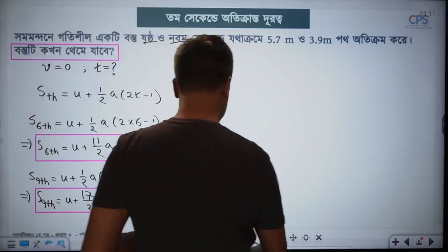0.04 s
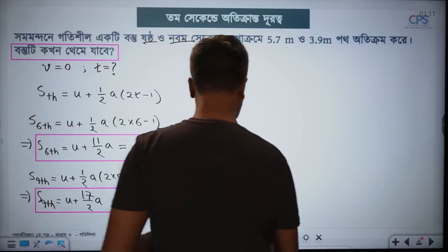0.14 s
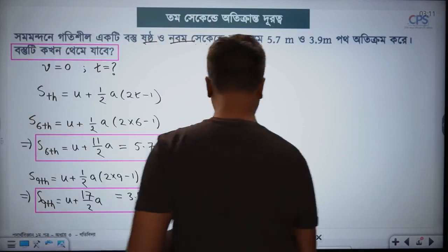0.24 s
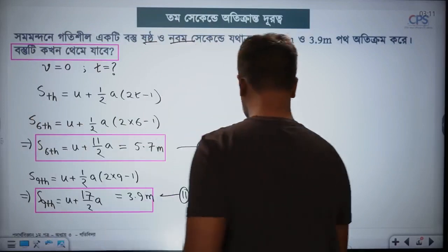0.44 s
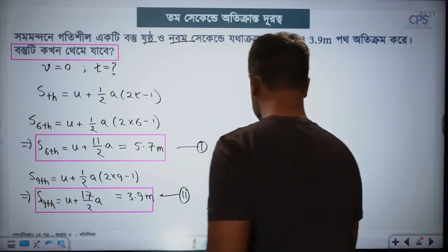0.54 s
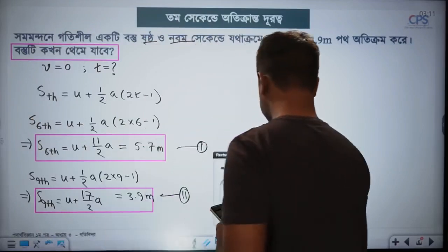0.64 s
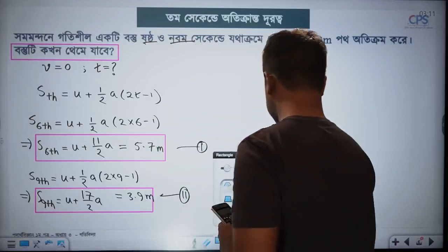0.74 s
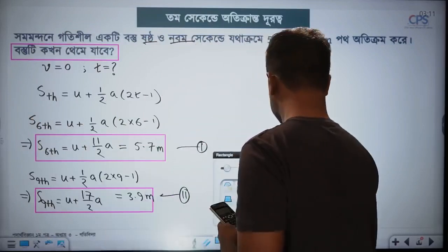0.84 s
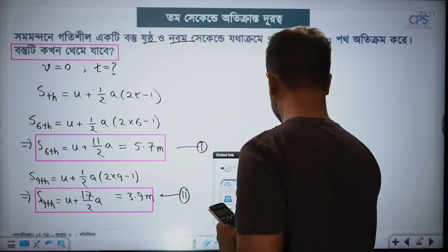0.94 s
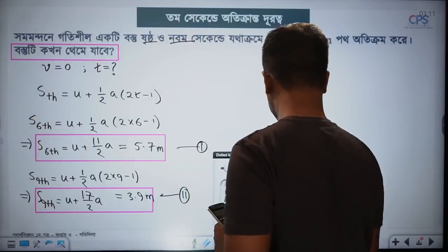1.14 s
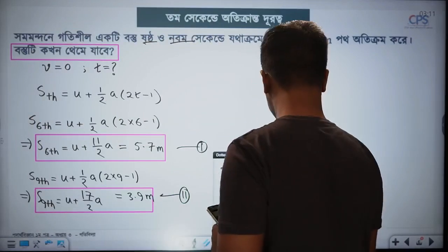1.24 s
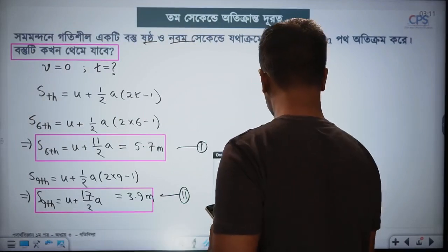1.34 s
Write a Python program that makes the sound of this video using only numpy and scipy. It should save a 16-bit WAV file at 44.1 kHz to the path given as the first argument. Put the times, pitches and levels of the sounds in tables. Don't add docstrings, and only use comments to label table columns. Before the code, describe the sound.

Three knocky plastic key presses on a handheld calculator, a quick pair then a later, crisper one, each with a slight rattle and brief classroom reverberation over very quiet hum, hiss and soft clothing movement.

```python
import sys
import numpy as np
from scipy import signal
from scipy.fft import rfft, irfft, next_fast_len
from scipy.io import wavfile
from scipy.ndimage import uniform_filter1d, map_coordinates

SR = 44100
rng = np.random.default_rng(int(sys.argv[2]) if len(sys.argv) > 2 else 0)


def transcribe(signal):
    frames = np.atleast_2d(signal).T
    limited = np.clip(frames, -1, 1)
    pcm = np.round(limited * 32767).astype(np.int16)
    wavfile.write(sys.argv[1], SR, pcm)


def field_ratio(decibels):
    return 10 ** (np.asarray(decibels, dtype=float) / 20)


N = 61739

# start_s, peak_db, contact_ms, crack_db
PRESSES = [
    (.202, -17.5, 0.69, -25.5),
    (0.3507, -24, 0.86, -24),
    (1.0078, -19, 0.51, -16),
]
# centre_hz, width_hz, level_db
CASE_MODES = [
    [(244, 210, 2), (532, 420, 5.5), (1065, 240, 6.5), (3350, 400, -2)],
    [(255, 120, 13), (486, 480, 18), (980, 600, 9), (3080, 440, -24)],
    [(330, 300, 5.5), (556, 1200, -8), (1093, 350, 2), (3150, 220, -15)],
]
# centre_hz, width_hz, level_db
SHELL_MODES = [
    [(2360, 190, 4), (3280, 600, -3), (4070, 630, -1), (5700, 1900, -6.5), (12100, 13400, -13)],
    [(2170, 260, 2), (3130, 760, -1), (4200, 690, -2), (6040, 4450, -7.5), (10000, 4100, -29)],
    [(2000, 660, 9.5), (2860, 1400, 11), (4400, 580, -34), (5850, 4500, 4), (9500, 3200, -2.5)],
]
# pitch_hz, level_db, t60_s
PANEL_MODES = [
    [(151.5, -5, 0.485), (177.2, -0.5, 0.18), (201.3, -4, 0.38), (289.7, -2.5, 0.35), (324.6, -4, 0.4),
     (477.4, 3.5, 0.23), (547, 3, 0.19), (829, -3, 0.26), (937, -4, .2), (1080, -8, 0.093)],
    [(170, 1.5, 0.19), (283, -3, 0.4), (327, -8, 0.64), (479, -1, 0.28), (582, 3.5, 0.2), (808, -8, 0.36),
     (1135, -11, .2)],
    [(156.5, -4, 0.32), (200.1, -3, 0.37), (240.6, -13, 0.58), (309.5, -2, 0.39), (352, 6, 0.27),
     (478, -6, 0.37), (697, -23, 0.57), (864, -14.5, 0.45), (1190, -14, 0.4)],
]
# pitch_hz, t60_s, level_db
CAP_RINGS = [
    (3210, 0.011, -28),
    (3160, 0.011, -25),
    (3030, 0.0058, -16),
]
TOUCH_LEAD_S = [0.00166, 0.0037, 0.0044]
TOUCH_DB = [-23, -38, -38]
RATTLE_DB = [-3, -2.5, -3]
# delay_s, level_db
WALLS = [(.0039, -13.5), (.0072, -8), (0.0111, -8), (0.017, -14.5), (.022, -24), (.029, -33)]
WALL_DB = [-0.5, 1.5, -14.5]
WALL_SCATTER_S = [0, .001, .001]
# freq_hz, t60_s
ROOM_DECAY = [(150, 0.54), (400, 0.42), (1000, 0.29), (2800, 0.35), (7300, 0.34), (15000, 0.47)]
KNOCK_ROOM_DB = [0, 0.5, 0.5]
CRACK_ROOM_DB = [6.5, 4, 4.5]
# start_s, level_db, brightness_db_per_octave
RUSTLE = [(0, -70, 1.5), (0.031, -69.5, -3.5), (.12, -76.5, -0.5), (.415, -85, 1), (.432, -69.5, 6.5),
          (.47, -64.5, 1), (0.531, -79.5, 4), (.58, -73, -3.5), (.67, -76, 2.5), (.715, -66.5, -0.5),
          (.745, -65.5, -0.5), (.8, -66.5, -1), (0.858, -76.5, -1.5), (.99, -81, -3), (1.12, -83, -3),
          (1.2, -68.5, -1.5), (1.3, -78, -2), (1.4, -81.5, -4.5)]
# freq_hz, density_db_per_hz
CLOTH_SPECTRUM = [(590, -16), (1000, -2.5), (1100, -1), (1320, -4), (2460, -7), (3250, -4.5), (7630, -11),
                  (8280, -7.5), (15800, -22)]
# freq_hz, density_db_per_hz
AIR_SPECTRUM = [(60, -37), (130, 1.5), (300, 2.5), (550, -3), (900, -11.5), (2000, -16.5), (5000, -30.5),
                (15800, -60)]
# time_s, level_db
AIR_LEVEL = [
    [(0.0, -59), (0.014, -61.5), (0.11, -64), (0.19, -64.5)],
    [(0.55, -61), (0.698, -62), (0.71, -65), (0.99, -65)],
    [(1.22, -65.5), (1.316, -61.5), (1.322, -63), (1.4, -65)],
]
# freq_hz, density_db_per_hz
HISS_SPECTRUM = [(500, 6.5), (3000, -3.5), (6500, -5.5), (8050, -1.5), (11000, -4.5), (15500, -3.5),
                 (15800, -36)]
# freq_hz, density_db_per_hz
RUMBLE_SPECTRUM = [(20, -2), (40, -6.5), (90, 2.5), (120, -2.5), (160, -44)]
# time_s, level_db
HUM_LEVEL = [(0, -72), (.5, -74), (.72, -67), (.85, -71.5), (1.4, -72.5)]
# freq_hz, gain_db
TREBLE_DIP = [(6000, 0), (7300, -3.5), (7800, -11), (8000, 0)]

PANEL_DB, PANEL_RISE_CYCLES = 4.5 - 23.5, 2.9
CRACK_T60_S = 0.035
FAR_WALL_S, FAR_WALL_DB = 0.0205, -7
ROOM_RISE_S = 0.0039
LOW_CUT_HZ, EDGE_HZ, EDGE_DAMPING = 140, 1460, 0.98
CLOTH_SPLIT_HZ = 6000
HISS_DB, RUMBLE_DB = -72, -78
HUM_HZ, HUM_WOBBLE_DB = 120.6, 1.6
MIC_TOP_HZ = 15750
PRESS_T_S = np.arange(SR // 2) / SR


def keys():
    out = np.zeros(N + SR)
    settings = zip(CASE_MODES, SHELL_MODES, PANEL_MODES, WALL_DB, WALL_SCATTER_S,
                   KNOCK_ROOM_DB, CRACK_ROOM_DB, RATTLE_DB, CAP_RINGS)
    for event, own, lead_s, touch_db in zip(PRESSES, settings, TOUCH_LEAD_S, TOUCH_DB):
        start_s, peak_db, contact_ms, crack_db = event
        full, knock = press(contact_ms, crack_db, *own)
        out[round(start_s * SR):][:len(full)] += field_ratio(peak_db) * full
        out[round((start_s - lead_s) * SR):][:len(knock)] += field_ratio(peak_db + touch_db) * knock
    return out[:N]


def press(contact_ms, crack_db, case, shell, panel, wall_db, scatter_s,
          knock_room_db, crack_room_db, rattle_db, cap):
    knock = case_knock(contact_ms, case)
    click = shell_click(contact_ms, crack_db, shell)
    direct = knock + click + rattle(click, rattle_db) + cap_ring(contact_ms, *cap)
    send = field_ratio(knock_room_db) * knock + field_ratio(crack_room_db) * click
    wet = signal.fftconvolve(send, room_tail())[:len(knock)]
    return direct + wall_echoes(knock, wall_db, scatter_s) + panel_ring(panel) + wet, knock


def case_knock(contact_ms, case):
    push = -np.sin(np.pi * np.clip(PRESS_T_S * 1000 / contact_ms, 0, 1)) ** 2

    def radiation(f):
        low_cut = (-f * f / (LOW_CUT_HZ ** 2 - f * f + 1j * f * LOW_CUT_HZ * np.sqrt(2))) ** 2
        return low_cut * EDGE_HZ ** 2 / (EDGE_HZ ** 2 - f * f + 1j * f * EDGE_HZ * EDGE_DAMPING)

    knock = filtered(filtered(push, resonances(case)), radiation)
    return knock / np.abs(knock).max()


def shell_click(contact_ms, crack_db, shell):
    impulse = np.zeros(len(PRESS_T_S))
    impulse[round(contact_ms * SR / 2000)] = -1
    click = filtered(impulse, resonances(shell, sign=-1))
    return field_ratio(crack_db) * click / np.abs(click).max()


def rattle(click, rattle_db):
    fade = field_ratio(-60 * PRESS_T_S / CRACK_T60_S)
    back_fade = field_ratio(FAR_WALL_DB - 60 * np.abs(PRESS_T_S - FAR_WALL_S) / CRACK_T60_S)
    back = (PRESS_T_S > FAR_WALL_S) * back_fade
    chatter = field_ratio(rattle_db) * (fade + back) * rng.standard_normal(len(PRESS_T_S))
    return signal.fftconvolve(chatter, click)[:len(click)] / 4


def cap_ring(contact_ms, pitch_hz, t60_s, level_db):
    late_s = np.maximum(PRESS_T_S - contact_ms / 2000, 0)
    return field_ratio(level_db - 60 * late_s / t60_s) * np.sin(2 * np.pi * pitch_hz * late_s)


def panel_ring(modes):
    ring = np.zeros(len(PRESS_T_S))
    for pitch_hz, level_db, t60_s in modes:
        rise = 1 - np.exp(-PRESS_T_S * pitch_hz / PANEL_RISE_CYCLES)
        tone = np.sin(2 * np.pi * (pitch_hz * PRESS_T_S + rng.random()))
        ring += field_ratio(level_db - 60 * PRESS_T_S / t60_s) * tone * rise
    return field_ratio(PANEL_DB) * ring


def wall_echoes(knock, wall_db, scatter_s):
    jitter_s = rng.standard_normal(len(WALLS)) * scatter_s

    def echoes(f):
        return sum(field_ratio(level_db + wall_db) * np.exp(-2j * np.pi * f * (delay_s + shift_s))
                   for (delay_s, level_db), shift_s in zip(WALLS, jitter_s))

    return filtered(knock, echoes)


def room_tail():
    hz, t, z = signal.stft(rng.standard_normal(SR // 2), SR, nperseg=256)
    decay = field_ratio(-60 * t / along(ROOM_DECAY, hz)[:, None])
    h = signal.istft(z * decay, SR, nperseg=256)[1][:SR // 2]
    h = h * (1 - np.exp(-np.arange(len(h)) / SR / ROOM_RISE_S))
    return h / np.linalg.norm(h)


def clothes():
    start_s, level_db, bright = np.transpose(RUSTLE)
    rub = rush(CLOTH_SPECTRUM, patchy_db=2.5)
    dull = filtered(rub, lambda hz: 1 / (1 + (hz / CLOTH_SPLIT_HZ) ** 2))
    tilt = field_ratio(2 * curve(np.transpose([start_s, bright])))
    swell = field_ratio(curve(np.transpose([start_s, level_db])))
    grain = field_ratio(1.2 * wobble(60))
    return swell * grain * (dull / tilt + (rub - dull) * tilt)


def background():
    air_db = curve(sum(AIR_LEVEL, [])) + 1.3 * wobble(25)
    air = field_ratio(air_db) * rush(AIR_SPECTRUM, patchy_db=1.5)
    hum_db = curve(HUM_LEVEL) + HUM_WOBBLE_DB * wobble(13.8)
    hum_phase = 2 * np.pi * HUM_HZ * np.arange(N) / SR + 0.5 * wobble(9)
    hum = np.sqrt(2) * field_ratio(hum_db) * np.sin(hum_phase)
    rumble = field_ratio(RUMBLE_DB) * rush(RUMBLE_SPECTRUM, patchy_db=-0.5)
    hiss = field_ratio(HISS_DB) * rush(HISS_SPECTRUM, patchy_db=0.5)
    return air + hum + rumble + hiss


def rush(spectrum, patchy_db):
    z = signal.stft(rng.standard_normal(N + 512), nperseg=512)[2]
    field = uniform_filter1d(rng.standard_normal(z.shape), 6, 0)
    field = uniform_filter1d(field, 8, 1)
    x = signal.istft(z * field_ratio(patchy_db * unit(field)), nperseg=512)[1][:N]
    return unit(filtered(x, lambda hz: field_ratio(along(spectrum, hz))))


def resonances(peaks, sign=1):
    def response(f):
        return sum(sign ** k * field_ratio(db) * 1j * f * width / (centre * centre - f * f + 1j * f * width)
                   for k, (centre, width, db) in enumerate(peaks))

    return response


def filtered(x, response):
    m = next_fast_len(len(x) + SR // 2)
    return irfft(rfft(x, m) * response(np.fft.rfftfreq(m, 1 / SR)), m)[:len(x)]


def wobble(rate_hz):
    knots = rng.standard_normal(int(N * rate_hz / SR) + 4)
    return map_coordinates(knots, [np.arange(N) * rate_hz / SR])


def curve(rows):
    s, v = np.transpose(rows)
    return np.interp(np.arange(N) / SR, s, v)


def along(points, hz):
    f, v = np.transpose(points)
    return np.interp(np.log(hz + 1), np.log(f + 1), v)


def unit(x):
    return x / np.sqrt(np.mean(x ** 2) + 1e-20)


def scene():
    return (keys() + clothes() + background())[None]


def top_cut(x):
    return signal.sosfilt(signal.butter(12, 16500, fs=SR, output="sos"), x)


def record(dry):
    def treble_shape(hz):
        return np.where(hz < MIC_TOP_HZ, field_ratio(along(TREBLE_DIP, hz)), field_ratio(-21))

    mix = filtered(dry[0], treble_shape)[None]
    return top_cut(mix)


dry = scene()
out = record(dry)
transcribe(out)
```